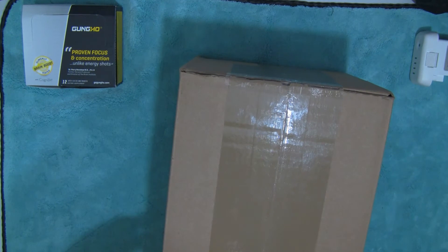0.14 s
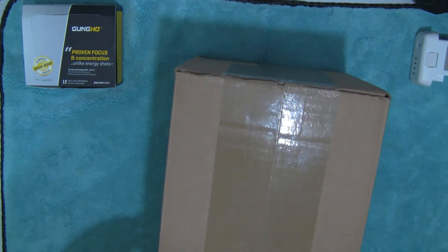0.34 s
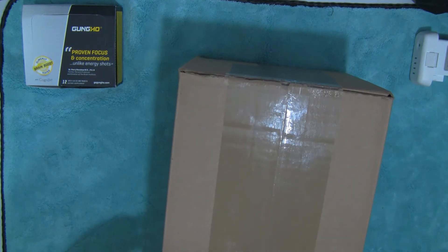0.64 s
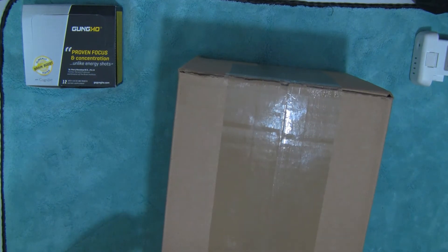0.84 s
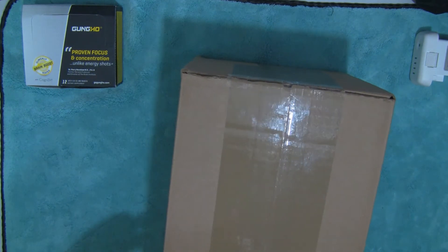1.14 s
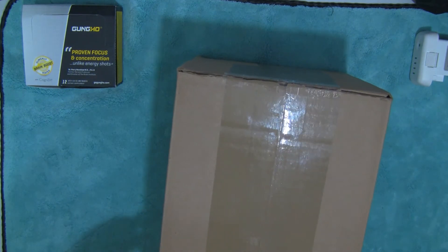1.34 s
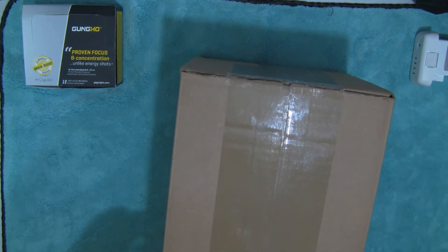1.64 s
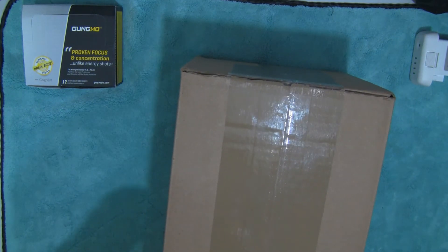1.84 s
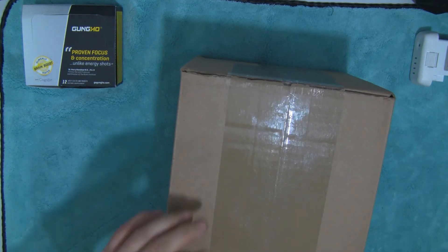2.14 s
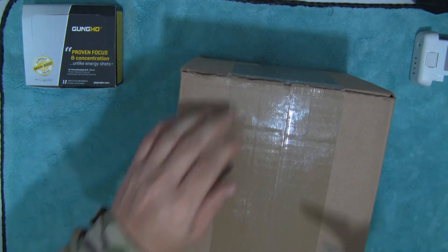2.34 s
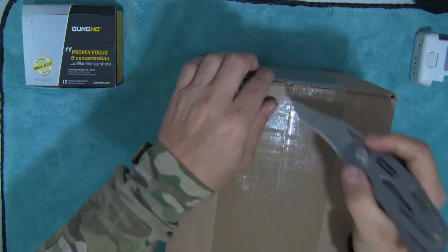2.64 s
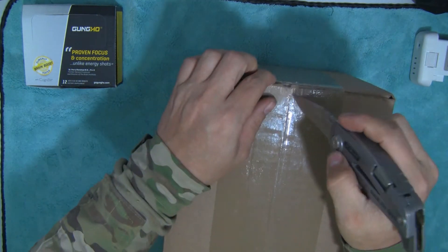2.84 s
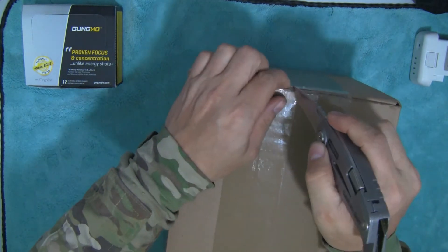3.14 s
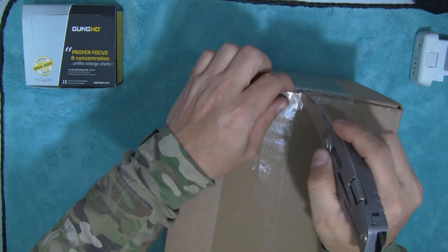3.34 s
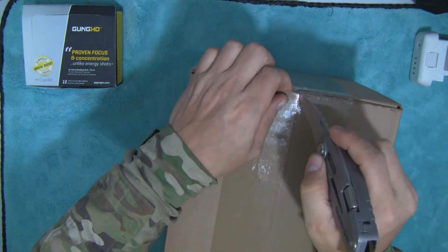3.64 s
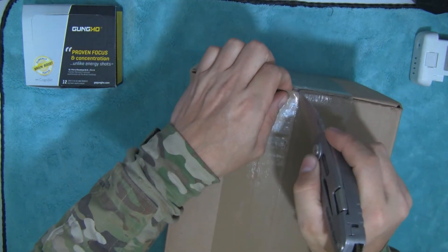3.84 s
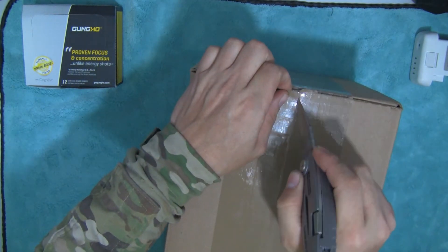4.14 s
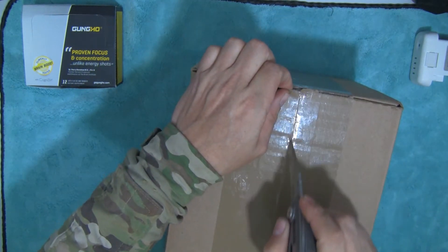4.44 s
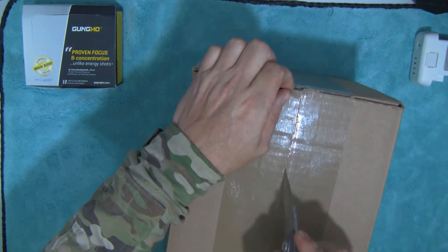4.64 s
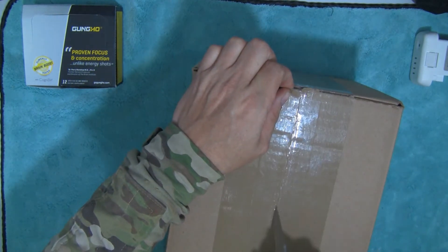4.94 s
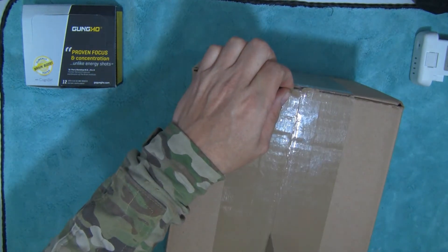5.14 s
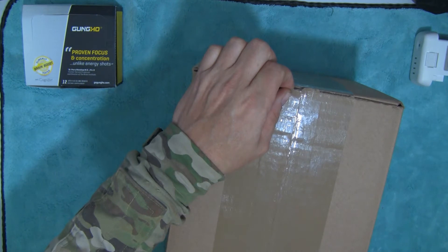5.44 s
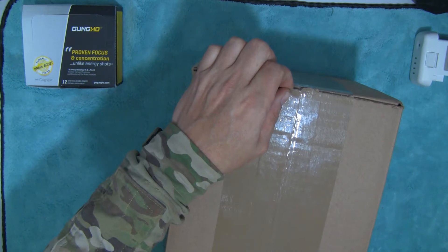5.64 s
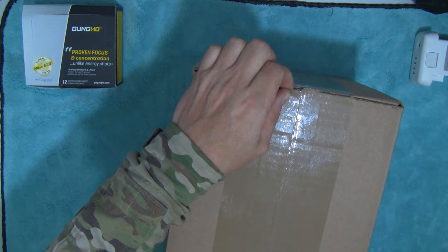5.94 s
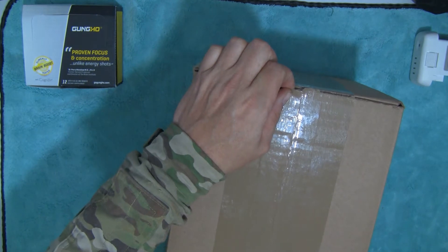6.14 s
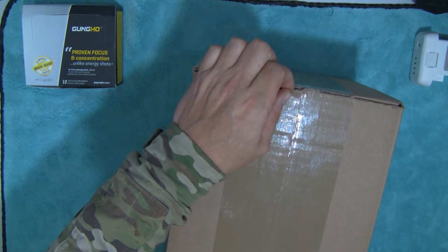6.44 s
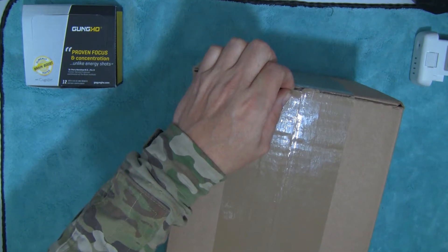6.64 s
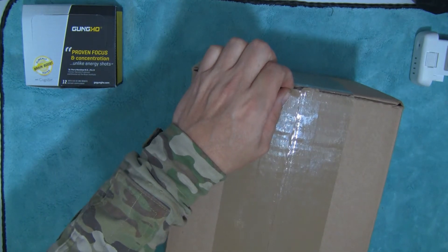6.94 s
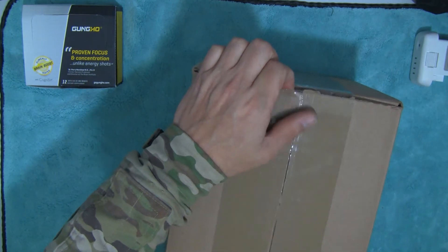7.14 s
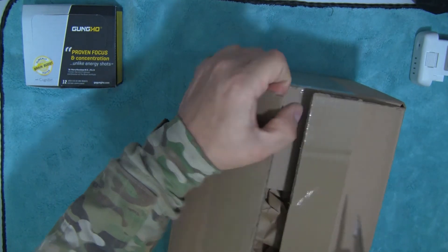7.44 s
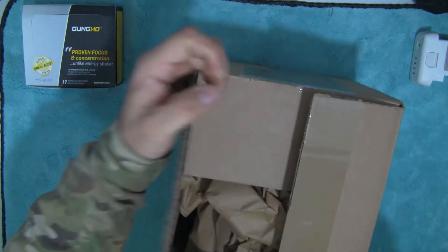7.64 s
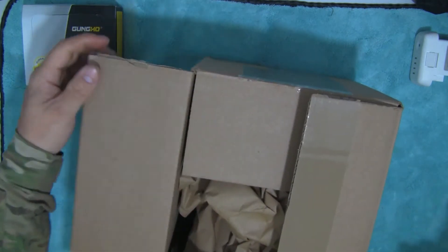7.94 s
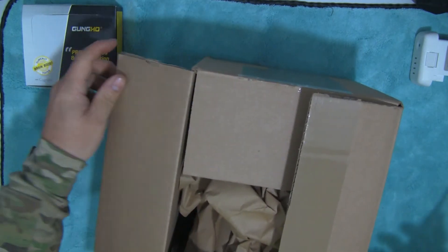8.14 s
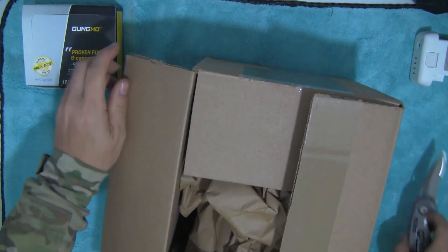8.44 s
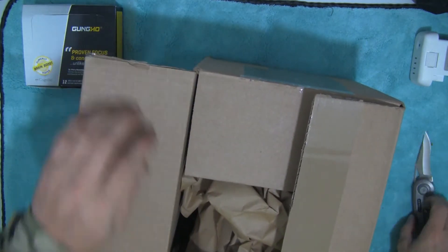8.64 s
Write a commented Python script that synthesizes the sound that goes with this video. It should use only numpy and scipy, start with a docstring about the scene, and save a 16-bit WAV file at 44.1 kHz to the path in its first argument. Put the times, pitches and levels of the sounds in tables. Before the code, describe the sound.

A cardboard box scuffs and squeaks, a folding knife clicks open, a blade saws jerkily through packing tape, then the flaps crack loose and open.

```python
"""A small quiet room, close to a taped cardboard box on a cloth-covered table.
The box is shifted with a scuff, a folding knife clicks open, a hand takes hold and the blade pops through the tape.
It saws along the seam in jerks that boom in the hollow box; the last tape snaps and a flap is folded back.
Rubs, knocks and rough bursts are random grit driving the box's resonances, plus coloured hiss from the surface;
squeak, tape twang, lid and flap are sine tones, and a decaying noise echo and steady air make the room."""
import sys
import numpy as np
from scipy import signal
from scipy.fft import rfft, irfft, next_fast_len
from scipy.io import wavfile
from scipy.ndimage import uniform_filter1d, map_coordinates

SR = 44100
rng = np.random.default_rng(int(sys.argv[2]) if len(sys.argv) > 2 else 0)


def transcribe(u):
    """Save the signal u as a 16-bit wav file named by the first command-line argument.

    u: samples, shape (n,) or (channels, n), limited to [-1, 1]; the rate is SR.
    q: integer samples, one column per channel.
    """
    v = np.clip(np.atleast_2d(u).T, -1, 1)
    q = np.round(v * 32767).astype(np.int16)
    wavfile.write(sys.argv[1], SR, q)


N = 387286  # length in samples
HIT = SR // 7  # length of one contact in samples

# Resonances of the cardboard walls: (f/Hz, width/Hz, level/dB)
WALLS = [(486, 113, 1.5), (728, 75, -0.5), (893, 58, 0.5), (1013, 115, -2.5), (1470, 320, -5),
         (1712, 140, -2), (2117, 574, -10)]
# Hiss of the blade in tape and board: (f/Hz, level/dB)
BLADE_HISS = [(900, -23.5), (1800, -4), (2600, 4.5), (3500, -5.5), (5000, -7.5), (8000, -6.5), (11000, -10),
              (15500, -31)]
# Hiss of papery tape and board under the fingers: (f/Hz, level/dB)
PAPER_HISS = [(900, -28), (2000, 4), (3000, 4), (4500, 1), (7000, -1.5), (11000, -7.5), (15500, -16.5)]
# Spectrum of cracking tape and board: (f/Hz, level/dB)
CRACK_SPECTRUM = [(700, -17.5), (2000, -3), (2900, 5), (3800, 3), (4800, -4), (7000, -4), (10000, -9),
                  (15500, -20.5)]
# Difference between the ears, in the echo and the air: (f/Hz, level/dB)
WIDTH = [(50, -18), (150, -30), (260, -21), (400, -17), (700, -14), (2400, -15), (4400, -7), (8000, -3),
         (15000, -1)]
# Where the blade is: (t/s, place on the seam: 0 its start, 1 its springy middle, 2 its end)
BLADE_PLACE = [(4.5, 0.4), (4.85, 0.89), (5.2, 1.083), (5.46, 1.89)]


def amp(db):
    """Decibels to gain."""
    return 10 ** (np.asarray(db) / 20)


def unit(x):
    """Scale to rms 1."""
    return x / np.sqrt(np.mean(x ** 2) + 1e-20)


def crest(x):
    """Scale so that the loudest few milliseconds have rms 1."""
    return x / np.sqrt(uniform_filter1d(x ** 2, size=256).max() + 1e-20)


def along(points, hz):
    """Read (f/Hz, value) points on a log frequency axis."""
    f, v = np.transpose(points)
    return np.interp(np.log(hz + 1), np.log(f), v)


def wobble(rate, size):
    """A smooth random curve with rate knots a second."""
    knots = rng.standard_normal(size // 8)
    return map_coordinates(knots, [np.arange(size) * rate / SR], mode="mirror")


def filtered(x, response):
    """Multiply the spectrum of x by a response given as a function of frequency."""
    size = x.shape[-1]
    padded = 2 * next_fast_len(size // 2 + SR // 30, real=True)
    hz = np.fft.rfftfreq(padded, 1 / SR)
    return irfft(rfft(x, padded) * response(hz), padded)[..., :size]


def ring(x, modes):
    """Drive a set of damped resonances, neighbours in opposite polarity."""
    def response(f):
        total = 0
        for k, (centre, width, db) in enumerate(modes):
            damping = 1j * f * width
            total = total + (-1) ** k * amp(db) * damping / (centre * centre - f * f + damping)
        return total
    return filtered(x, response)


def colour(x, points):
    """Shape the spectrum of x with a causal, minimum-phase filter."""
    def response(hz):
        cepstrum = irfft(np.log(amp(along(points, hz))))
        half = len(cepstrum) // 2
        # fold the cepstrum forward in time, so nothing sounds early
        cepstrum[1:half] *= 2
        cepstrum[half + 1:] = 0
        return np.exp(rfft(cepstrum))
    return filtered(x, response)


def add(track, s, x):
    """Mix x into the track at s seconds."""
    start = max(round(s * SR), 0)
    track[start:start + len(x)] += x[:max(N - start, 0)]


def grit(size, grain_db, grain_rate=1800):
    """Fibres breaking: a dense run of tiny impulses of very uneven strength."""
    return rng.standard_normal(size) * amp(grain_db * wobble(grain_rate, size))


def burst(rise, t60, grain_db):
    """A short run of grit that swells and dies."""
    t = np.arange(HIT) / SR
    return grit(HIT, grain_db) * (1 - np.exp(-t / rise)) * amp(-60 * t / t60)


def hollow(force):
    """The hollow box rings under a force, with the treble above about 620 Hz rolled off."""
    # Resonances of the hollow box: (f/Hz, width/Hz, level/dB)
    hollow_modes = [(89, 17, -14), (117, 15.5, -10.5), (217.4, 47.4, 2), (260, 30, 1.5), (315.7, 51.7, 5),
                    (356.7, 91, -4.5)]
    rolloff = signal.butter(2, 620, fs=SR, output="sos")
    return signal.sosfilt(rolloff, ring(force, hollow_modes))


def panel(hz):
    """The walls' resonances, led by that of the panel that is touched."""
    sharpness, lead_db = 5.3, 10.5
    return WALLS + [(hz, hz / sharpness, lead_db)]


def jolt(boom_db, walls_db, hiss_db, rise, t60, spectrum, grain_db, shove, modes=WALLS):
    """One contact: a shove and a burst of grit sound the hollow, the walls and the surface."""
    force = burst(rise, t60, grain_db)
    push = force / np.linalg.norm(force)
    contact = np.hanning(SR // 1500)
    push[SR // 1000:][:len(contact)] += shove * contact / contact.sum()  # the shove comes 1 ms in
    boom = amp(boom_db) * crest(hollow(push))
    walls = amp(walls_db) * crest(ring(push, modes))
    hiss = amp(hiss_db) * crest(colour(force, spectrum))
    return boom + walls + hiss


def slide(s, boom_db, walls_db, hiss_db, spectrum, grain_db, judder_db, judder_rate):
    """Friction: grit under a juddering pressure drives the box from s on, at one level per sample."""
    length = len(walls_db)
    # draw whole half seconds of grit, then keep what is needed
    size = (2 * length // SR + 1) * SR // 2
    pressure = amp(judder_db * wobble(judder_rate, size))
    force = (grit(size, grain_db) * pressure)[:length]
    boom = amp(boom_db) * unit(hollow(force))
    walls = amp(walls_db) * unit(ring(force, WALLS))
    hiss = amp(hiss_db) * unit(colour(force, spectrum))
    t = np.arange(length) / SR
    fade = np.clip(np.minimum(t, t[-1] - t) / 0.0031, 0, 1)
    track = np.zeros(N)
    add(track, s, (boom + walls + hiss) * fade)
    return track


def drag(curve, ref_db, boom_db, boom_slope, walls_db, hiss_db, hiss_slope, **texture):
    """A long slide under one effort curve: boom and hiss each grow by their own slope around ref_db."""
    s, db = np.transpose(curve)
    t = np.arange(round(s[0] * SR), round(s[-1] * SR)) / SR
    effort = np.interp(t, s, db) - ref_db
    return slide(s[0], boom_db + boom_slope * effort, walls_db + effort,
                 hiss_db + hiss_slope * effort, **texture)


def rubs(rows, boom_db, **texture):
    """Short slides that fade in, grow or wane steadily, and fade out."""
    attack_s, release_s = 0.026, 0.043
    track = np.zeros(N)
    for s, length, db, hiss_db, swell_db in rows:
        t = np.arange(round(length * SR)) / SR
        gate = np.clip(np.minimum(t / attack_s, (length - t) / release_s), 1e-3, 1)
        level = db + swell_db * (t / length - .5) + 20 * np.log10(gate)
        track += slide(s, level + boom_db, level, level + hiss_db, **texture)
    return track


def air():
    """Steady room noise, nearly alike in both ears in the bass."""
    # Spectrum of the room noise: (f/Hz, level/dB)
    air_spectrum = [(25, -28), (60, -4.5), (300, 1), (600, -3.5), (1400, -7), (3000, -13), (4800, -14.5),
                    (9000, -23), (15500, -30)]
    mid, side = colour(rng.standard_normal((2, N)), air_spectrum)
    side = amp(1) * colour(side, WIDTH)
    return amp(-55.5) * unit(np.array([mid + side, mid - side]))


def knocks():
    """Fingers and blade bump the box, each bump a shove on one panel; harder bumps are brighter."""
    # Bumps: (t/s, level/dB, hardness/dB, pitch of the touched panel f/Hz)
    bumps = [(0.014, -36, 3, 940), (0.087, -41.5, -1, 850), (0.211, -35.5, -3.5, 690), (0.318, -45, 2, 950),
             (1.282, -26.5, -9, 750), (1.305, -30.5, -14, 890), (1.445, -42, 9.5, 745),
             (1.548, -44.5, 2.5, 650), (2.398, -30, -0.5, 805), (2.424, -37, 6, 740),
             (2.437, -43.5, 10.5, 704), (2.581, -33.5, -3, 497), (2.632, -39, -5, 690),
             (2.651, -32, -12, 690), (2.769, -40, 3.5, 1690), (2.837, -17, -14, 940), (2.919, -38, -5, 674),
             (2.969, -27.5, -9, 970), (3.014, -45.5, 12, 1560), (3.092, -26, -12, 517),
             (3.116, -24.5, -11, 500), (3.47, -30, -4, 503), (3.568, -32.5, -6, 1020),
             (6.303, -36.5, 3, 1590), (6.61, -24, -3.5, 690), (6.752, -26.5, 0.5, 700),
             (6.814, -15.5, -17, 566), (7.319, -29.5, -6, 720), (7.386, -30, -6, 770),
             (8.419, -47, -0.5, 1500), (8.649, -35, 4.5, 920)]
    # A light bump sounds the lid more than the whole box: (f/Hz, level/dB)
    bump_spectrum = [(110, -6), (320, 2.5), (600, 0)]
    track = np.zeros(N)
    for s, db, hard_db, hz in bumps:
        bump = jolt(0, hard_db, hard_db - 12, rise=0.00023, t60=0.072, spectrum=PAPER_HISS,
                    grain_db=-4.5, shove=1.0, modes=panel(hz))
        add(track, s, amp(db - 4.0) * colour(bump, bump_spectrum))
    return track


def board_rubs():
    """Fingers, blade and flap rub on the board and pry at the seam: short gritty slides."""
    # Rubs: (t/s, length/s, level/dB, hiss against it/dB, swell over the length/dB)
    rub_rows = [(0.43, 0.13, -51, -8.5, 2), (1.245, 0.092, -44.5, 1.5, -10), (2.86, 0.075, -47, -7.5, 4),
                (3.04, 0.11, -49, -9, 5), (6.26, 0.079, -40.5, -3.5, 6), (6.39, .11, -51, -2, -20),
                (6.51, 0.27, -46.5, -4.5, -9), (6.745, 0.12, -37, -8.5, 6), (6.935, 0.22, -41, -7.5, 0.5),
                (7.18, 0.23, -41, -7, -4), (7.495, 0.2, -47.5, -4, -15.5), (7.8, 0.092, -49.5, -16, 1),
                (7.9, 0.14, -47.5, -4.5, -4), (8.18, 0.12, -47.5, -27, 10), (8.41, 0.12, -51.5, -12, 19)]
    return rubs(rub_rows, boom_db=-2.5, spectrum=PAPER_HISS, grain_db=2.5, judder_db=3.0, judder_rate=75.3)


def shift_scuff():
    """The box is pushed: friction scuffs under it, with more boom and hiss as the effort grows."""
    # The push: (t/s, effort level/dB)
    push_effort = [(0.764, -43), (0.776, -34.5), (0.846, -32.5), (0.876, -28), (0.9, -30), (0.95, -59)]
    # Hiss of the scuff: (f/Hz, level/dB)
    scuff_hiss = [(900, -27), (2000, -2), (2700, 5.5), (3700, 1.5), (4600, 1), (7000, -5.5), (10000, -12),
                  (15500, -20)]
    return drag(push_effort, ref_db=-27.5, boom_db=-29.5, boom_slope=0.51, walls_db=-27.5,
                hiss_db=-25.5, hiss_slope=0.98, spectrum=scuff_hiss,
                grain_db=1, judder_db=-3.0, judder_rate=205)


def snaps():
    """Stuck tape and creased board let go in single sharp cracks, each with a little fraying after it."""
    # Cracks: (t/s, peak level/dB, walls against it/dB)
    snap_rows = [(0.7828, -12.5, -12.5), (0.855, -10, -24), (0.862, -8, -29), (0.8647, -7, -28),
                 (0.8675, -2, -34), (0.8704, -3, -36), (0.8751, -4.5, -38), (0.8804, -1.5, -42),
                 (0.901, -14, -13), (1.5399, -33, 3), (3.913, -31, -9), (6.8357, -10, -13),
                 (7.129, -19.5, -8), (7.169, -10.5, -19), (7.222, -22, -23)]
    track = np.zeros(N)
    for s, db, walls_db in snap_rows:
        fray = burst(rise=.0003, t60=.016, grain_db=1)
        force = signal.unit_impulse(HIT, SR // 4000) + 1.5 * fray / np.linalg.norm(fray)
        crack = colour(force, CRACK_SPECTRUM)
        walls = amp(walls_db - 9) * crest(ring(force, WALLS))
        add(track, s, amp(db) * (crack / abs(crack).max() + walls))
    return track


def squeak():
    """The shifted box squeaks as it drags: an unsteady stick and slip, falling in pitch."""
    # Glide of the squeak: (t/s, pitch f/Hz, level/dB)
    squeak_glide = [(0.815, 1404, -46), (0.83, 1208, -25.5), (0.85, 976, -20), (0.862, 950, -46)]
    jitter, flutter_db = 0.18, 3  # wander of the pitch (share) and of the level (dB)
    s, hz, db = np.transpose(squeak_glide)
    t = np.arange(round(s[0] * SR), round(s[-1] * SR)) / SR
    pitch = np.interp(t, s, hz) * (1 + jitter * wobble(887, len(t)))
    level = amp(np.interp(t, s, db) + flutter_db * wobble(320, len(t)))
    track = np.zeros(N)
    add(track, s[0], level * np.sin(2 * np.pi * np.cumsum(pitch) / SR))
    return track


def rough_bursts():
    """Cardboard and tape rasp, crease or tear in short rough bursts that sound the whole box."""
    # Rough bursts: (t/s, level/dB, boom against it/dB, hiss against it/dB, pitch of the panel f/Hz)
    rough_rows = [(0.85, -22, 3.5, 1, 990), (0.9, -17, -0.5, -22, 730), (6.807, -23.5, -4, 0.5, 593),
                  (6.834, -26.5, -6, -1, 1850), (7.157, -26, -2, -5, 1540), (7.167, -9, -2.5, -8, 530),
                  (7.267, -17, -9, 0.5, 770), (7.282, -16.5, -22, -1, 2070), (7.288, -11, -6.5, -10.5, 766),
                  (7.303, -23.5, 0.5, -15, 710), (7.998, -30.5, -7, -14, 1320)]
    track = np.zeros(N)
    for s, db, boom_db, hiss_db, hz in rough_rows:
        rasp = jolt(boom_db, 0, hiss_db - 1.5, rise=.002, t60=0.08, spectrum=CRACK_SPECTRUM,
                    grain_db=3.0, shove=0.99, modes=panel(hz))
        add(track, s, amp(db - 4.5) * rasp)
    return track


def brushes():
    """Flap and sleeve brush the box: soft slides with a cloth-like hiss."""
    # Brushes: (t/s, length/s, level/dB, hiss against it/dB, swell over the length/dB)
    brush_rows = [(0.92, 0.19, -43.5, -1, 6), (1.1, 0.2, -49, 3, 16), (8.49, 0.17, -44, 4, 7),
                  (8.635, 0.12, -39.5, 2, 2.5)]
    # Hiss of cloth: (f/Hz, level/dB)
    cloth_hiss = [(410, -39), (700, -3), (971, -11), (1600, 5.5), (2400, -5), (4000, -5.5), (9110, -8.5),
                  (16000, -15)]
    return rubs(brush_rows, boom_db=-6.5, spectrum=cloth_hiss, grain_db=1.0, judder_db=0.6, judder_rate=74.0)


def knife():
    """The blade swings out and locks; the handle rings briefly and ticks in the grip."""
    # Clicks of lock and handle: (t/s, level/dB, ring of the handle against it/dB)
    click_rows = [(2.1147, -21.5, -11), (2.129, -29, -8), (2.1439, -23.5, -5.5), (2.463, -32.5, -7),
                  (3.161, -24.5, -20)]
    # Spectrum of a click: (f/Hz, level/dB)
    click_spectrum = [(300, -11), (1100, -9.5), (1500, -10), (2200, -12.5), (4000, 3.5), (5500, -4.5),
                      (7000, -7), (8500, -8), (10500, -13.5), (15500, -27)]
    # Resonances of the handle: (f/Hz, width/Hz, level/dB)
    handle_modes = [(1540, 140, 6), (1750, 160, -6)]
    track = np.zeros(N)
    for s, db, ring_db in click_rows:
        force = burst(rise=.0001, t60=0.026, grain_db=-2.0)
        click = crest(colour(force, click_spectrum))
        handle = amp(ring_db) * crest(ring(force, handle_modes))
        add(track, s, amp(db - 8.0) * (click + handle))
    return track


def grip():
    """The tape crinkles under the hand that holds the box and then pries at it."""
    # Crinkles: (t/s, length/s, level/dB, hiss against it/dB, swell over the length/dB)
    grip_rows = [(2.33, 0.91, -61, -2.5, -8), (3.2, 0.62, -53.5, -18, 1), (6.28, 1.3, -53.5, -7.5, 1.5)]
    return rubs(grip_rows, boom_db=-2.5, spectrum=PAPER_HISS, grain_db=2.5, judder_db=3.5, judder_rate=59)


def puncture(s=3.8688, twang_lag=0.0022, boom_lag=0.0094):
    """The point cracks through, the taut tape twangs, and the lid springs back."""
    # Tones of the taut tape: (f/Hz, level/dB, t60/s)
    tape_tones = [(994, -2, 0.024), (1180, -46, 0.02), (1606, -23.5, 0.054), (1775, -17, 0.044)]
    track, t = np.zeros(N), np.arange(HIT) / SR
    crack = colour(burst(rise=0.00082, t60=0.02, grain_db=-5.0), CRACK_SPECTRUM)
    add(track, s, amp(-22) * crest(crack))
    twang = sum(amp(db - 60 * t / t60) * np.sin(2 * np.pi * hz * t) for hz, db, t60 in tape_tones)
    add(track, s + twang_lag, amp(5.0) * twang * (1 - np.exp(-t / 0.0013)))
    add(track, s + twang_lag, jolt(-15.5, -17.5, -40.0, rise=0.00057, t60=0.052, spectrum=BLADE_HISS,
                                   grain_db=0.0, shove=1.1))
    lid = np.sin(2 * np.pi * 325 * t) * amp(-60 * t / 0.03) * (1 - np.exp(-t / 0.0035))
    add(track, s + boom_lag, amp(3.0) * lid)
    return track


def lid_spring(s):
    """Released by a slip at s, the lid springs back: still taut, it starts sharp and its pitch settles."""
    # The lid's settled pitch at the start, middle and end of the seam: (f/Hz each)
    lid_hz = [224, 334.5, 211.7]
    bend, settle_s, swell_s = 0.13, 0.012, 0.0078  # share it starts higher, its decay, time to the peak
    t = np.arange(HIT) / SR
    place = np.interp(s, *np.transpose(BLADE_PLACE))
    hz = np.interp(place, range(len(lid_hz)), lid_hz)
    pitch = hz * (1 + bend * np.exp(-t / settle_s))
    return amp(-4.5) * crest(np.sin(2 * np.pi * np.cumsum(pitch) / SR) * t * np.exp(-t / swell_s))


def splitting(rasp):
    """The film splits in tiny bright ticks at random moments, as strong as the rasp is just then."""
    # Spectrum of a tick: (f/Hz, level/dB)
    film_spectrum = [(1500, -24), (3000, -1), (7500, -10), (11000, 3), (15500, -6)]
    ticks_per_s, scatter_db = 260, 3.5
    treble = filtered(rasp, lambda f: f > 3000)
    strength = np.sqrt(abs(uniform_filter1d(treble ** 2, size=400)))
    ticks = (rng.random(N) < ticks_per_s / SR) * amp(scatter_db * rng.standard_normal(N))
    return amp(-11) * strength * unit(colour(ticks, film_spectrum))


def off_hand(x):
    """The treble returns off the knife hand with a wandering delay, so its colour keeps shifting."""
    share, delay_s = .35, .0006
    wander, wander_rate = .17, 7  # share of the delay, knots a second
    n = np.arange(N)
    treble = filtered(x, lambda f: f ** 2 / (f ** 2 + 1500 ** 2))
    delay = delay_s * SR * (1 + wander * wobble(wander_rate, N))
    return x + share * np.interp(n - delay, n, treble)


def cutting():
    """The blade rasps through tape and the board's edge, sticking and slipping; pressure brings out the boom."""
    # Two pulls of the blade along the seam, each: (t/s, pressure level/dB)
    pulls = [
        [(4.15, -44.5), (4.218, -42), (4.372, -40), (4.81, -46), (4.96, -31.5), (5.038, -31), (5.27, -35),
         (5.404, -42.5), (5.582, -47), (5.722, -60), (5.82, -91)],
        [(5.84, -59.5), (5.988, -32), (6.12, -45), (6.174, -42.5), (6.3, -63)],
    ]
    # The blade catches hard and slips: (t/s, level/dB, sharpness/dB)
    slip_rows = [(4.175, -22, 8), (4.286, -30, 10.5), (4.394, -24, 7), (4.471, -18.5, -6), (4.503, -12, -9),
                 (4.539, -15.5, -9.5), (4.596, -19.5, -4), (4.671, -19, -3), (4.773, -13.5, -4.5),
                 (4.832, -6.5, -5.5), (4.88, -12.5, 1.5), (4.938, -8.5, -5), (4.956, -8, -7.5),
                 (4.985, -14, -2), (5.008, -20.5, 6), (5.043, -15.5, -5), (5.085, -16.5, -3),
                 (5.103, -16.5, -9), (5.148, -16.5, 1), (5.165, -15, 0), (5.245, -12.5, -10),
                 (5.291, -16, -5), (5.341, -21, 3), (5.365, -13, 5.5), (5.406, -14.5, 2),
                 (5.432, -13, -2.5), (5.491, -16.5, 2.5), (5.586, -9, -24), (5.619, -18.5, -2),
                 (5.668, -12.5, -14.5), (5.71, -11.5, -19.5), (5.74, -15.5, -11), (5.769, -20.5, -6),
                 (5.961, -19, -6), (5.99, -14, 5), (6.029, -18, 3), (6.062, -24, 3), (6.081, -21.5, 12.5),
                 (6.107, -23, 5), (6.207, -20, 7)]
    # How the lid answers at the start, middle and end of the seam: (f/Hz, level/dB)
    lid_start = [(150, 1), (220, 7), (330, -0.5), (450, 6), (750, -6), (1000, 2), (1250, -5.5), (1750, 6.5),
                 (2300, -5), (3100, 2.5), (6500, 4.5), (12000, -2.5)]
    lid_middle = [(150, -10), (230, -2.5), (340, 3), (480, 6.5), (660, 2.3), (830, 7.5), (1250, -3.5),
                  (1600, -3.5), (2400, 6), (3100, -4.5), (3700, -1.2), (7500, -7), (11000, -2.5),
                  (14000, -1)]
    lid_end = [(150, -2), (220, 4), (330, -4.5), (450, 10), (620, 8.5), (850, 0), (1150, 1), (1500, 1.5),
               (1800, -2.3), (2400, -2.4), (3100, 0.5), (8000, -3.5), (12000, -2.5)]
    stick_s, stick_db = 0.03, -3.5  # before each slip the rasp sinks this long and this deep
    track = np.zeros(N)
    for pull in pulls:
        track += drag(pull, ref_db=-40.0, boom_db=-32.5, boom_slope=1.27, walls_db=-41.0,
                      hiss_db=-46.5, hiss_slope=0.98, spectrum=BLADE_HISS,
                      grain_db=0.5, judder_db=3.0, judder_rate=190)
    stuck = np.zeros(N)
    for s, _, _ in slip_rows:
        add(stuck, s - stick_s, np.hanning(round(stick_s * SR)))
    track = track * amp(stick_db * np.minimum(stuck, 1))
    for s, db, sharp_db in slip_rows:
        slip = jolt(-2.5, -9.5 + 0.51 * sharp_db, -23.5 + sharp_db, rise=0.0012, t60=0.097,
                    spectrum=BLADE_HISS, grain_db=3.5, shove=0.56)
        add(track, s, amp(db - 4.0) * (slip + lid_spring(s)))
    # crossfade the lid's answers as the blade moves along the seam
    place = np.clip(np.interp(np.arange(N) / SR, *np.transpose(BLADE_PLACE)), 0, 2)
    rasp = np.zeros(N)
    for k, lid in enumerate((lid_start, lid_middle, lid_end)):
        nearness = np.maximum(1 - abs(place - k), 0)
        rasp += nearness * colour(track, lid)
    return off_hand(rasp + splitting(rasp))


def flap_wag(s=8.652, hz=118, db=-40):
    """The loose flap wags at a low pitch when the hand lands on it: a sine that swells and dies."""
    track, t = np.zeros(N), np.arange(HIT) / SR
    add(track, s, amp(db) * crest(np.sin(2 * np.pi * hz * t) * t * np.exp(-t / 0.015)))
    return track


def echo(x, spectrum, delay=0.0017):
    """The room's diffuse answer: noise in which each frequency dies at its own speed."""
    # Decay of the room: (f/Hz, t60/s)
    room_decay = [(200, .55), (800, 0.26), (4000, 0.24), (14000, 0.13)]
    hz, t, noise = signal.stft(rng.standard_normal(SR // 3), SR, nperseg=256)
    t60 = along(room_decay, hz)[:, None]
    tail = signal.istft(noise * amp(-60 * t / t60) / np.sqrt(t60), SR, nperseg=256)[1]
    tail = colour(tail / np.linalg.norm(tail), spectrum)
    return signal.fftconvolve(x, np.pad(tail, (round(delay * SR), 0)))[:N]


def scene():
    """Everything happens just under the microphone, a little to the right."""
    # Echo common to both ears: (f/Hz, level/dB)
    echo_spectrum = [(200, -19), (1000, -12), (4000, -10.5), (12000, -12.5)]
    dry = knocks() + board_rubs() + shift_scuff() + snaps() + squeak() + rough_bursts() + brushes()
    dry += knife() + grip() + puncture() + cutting() + flap_wag()
    mid = dry + echo(dry, echo_spectrum)
    side = echo(dry, WIDTH)
    balance = amp([[-.35], [.35]])  # left, right
    return amp(-2) * np.array([mid + side, mid - side]) * balance + air()


def record(dry):
    """Nothing is kept above the band limit of 16.1 kHz."""
    return filtered(dry, lambda hz: hz < 16100)


dry = scene()
out = record(dry)
transcribe(out)
```